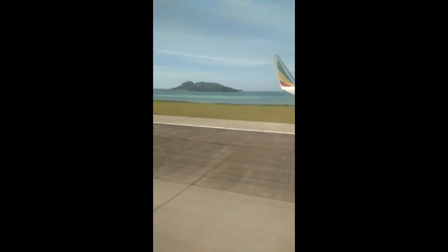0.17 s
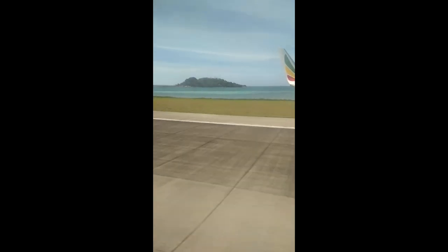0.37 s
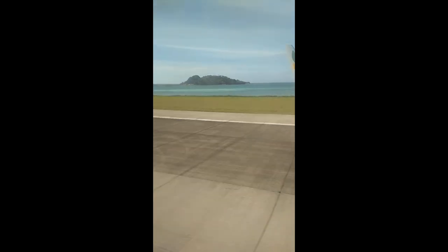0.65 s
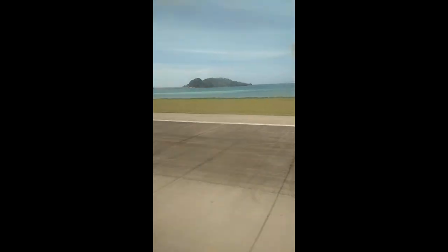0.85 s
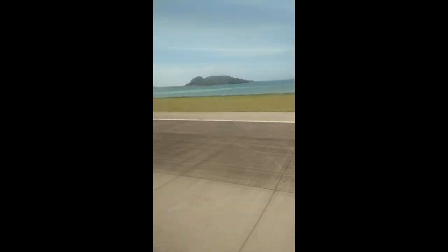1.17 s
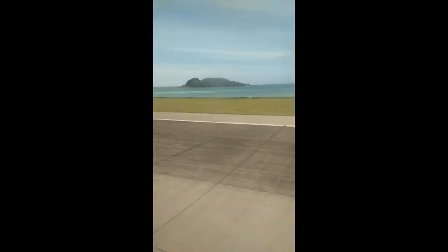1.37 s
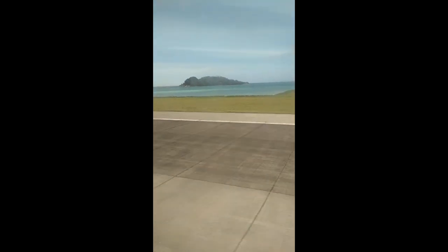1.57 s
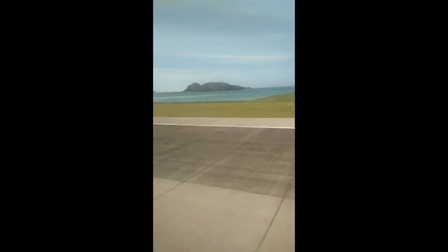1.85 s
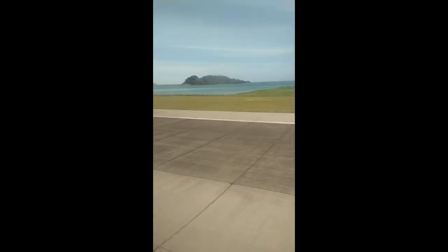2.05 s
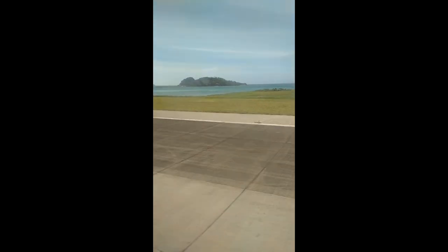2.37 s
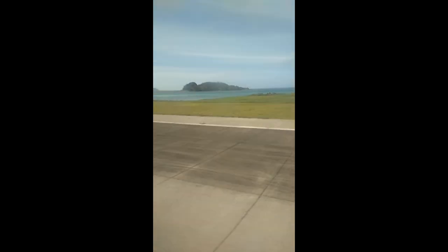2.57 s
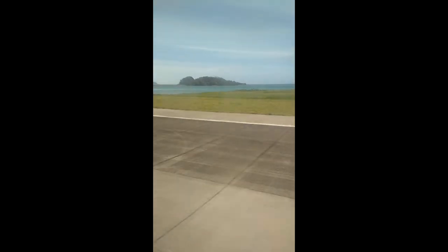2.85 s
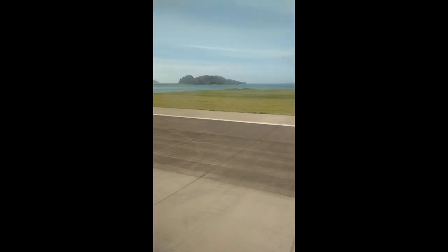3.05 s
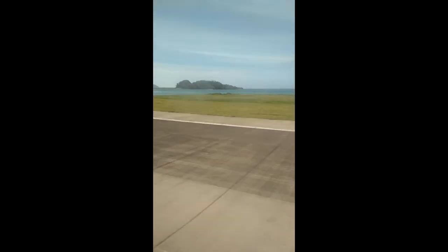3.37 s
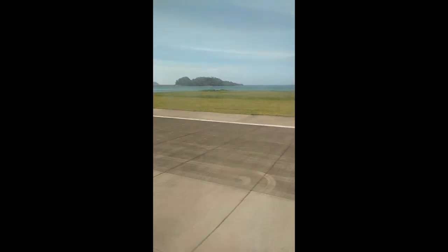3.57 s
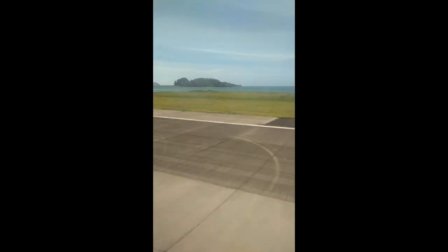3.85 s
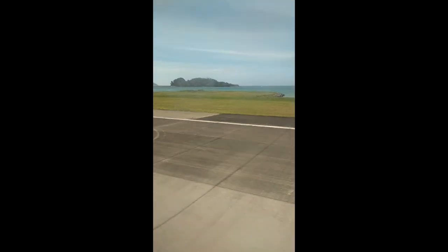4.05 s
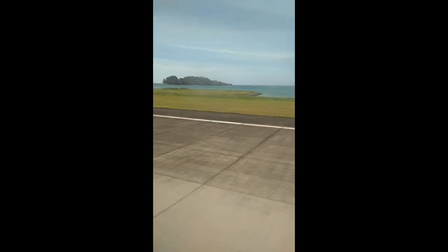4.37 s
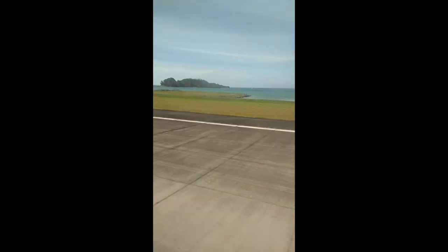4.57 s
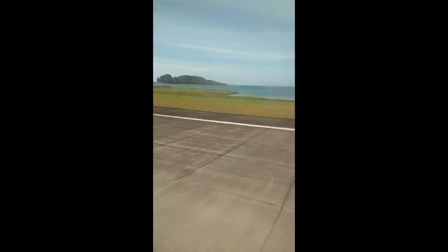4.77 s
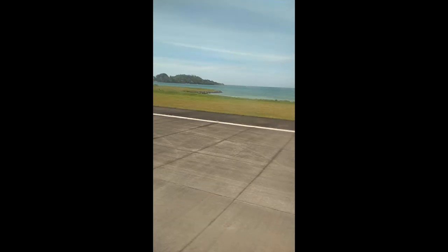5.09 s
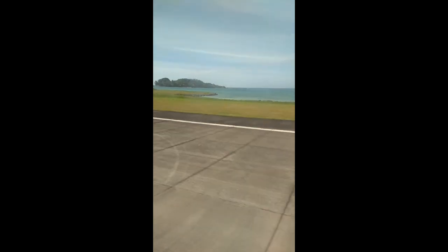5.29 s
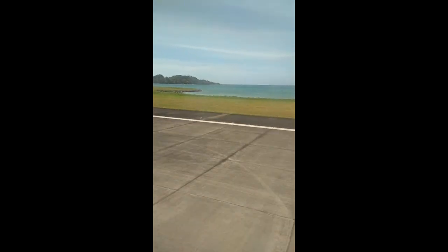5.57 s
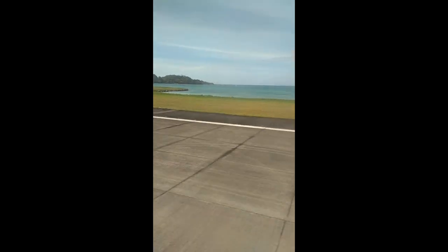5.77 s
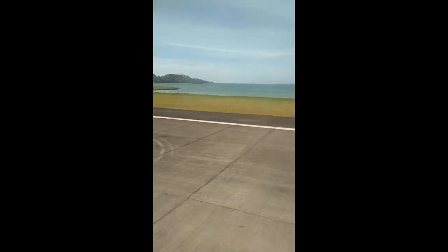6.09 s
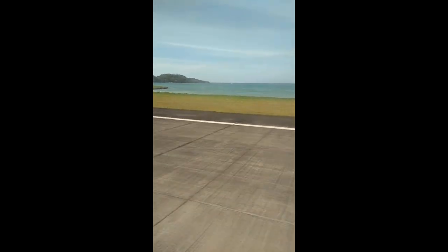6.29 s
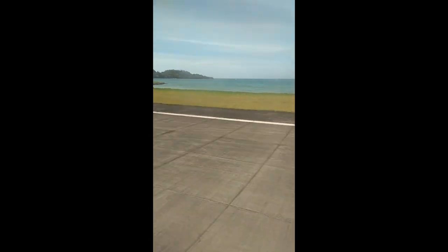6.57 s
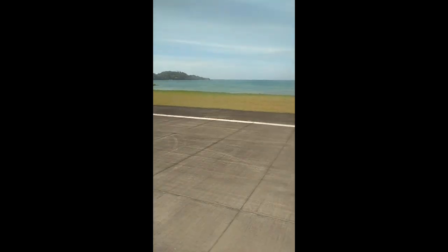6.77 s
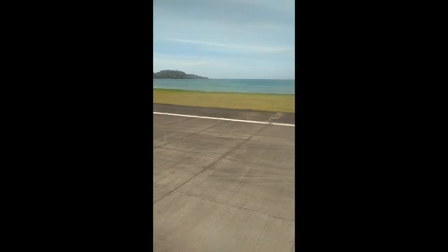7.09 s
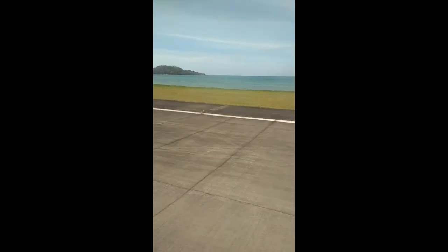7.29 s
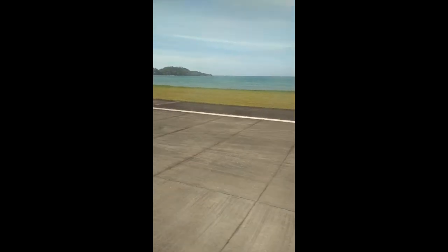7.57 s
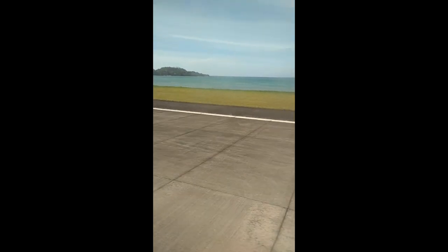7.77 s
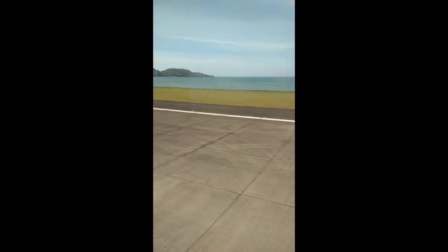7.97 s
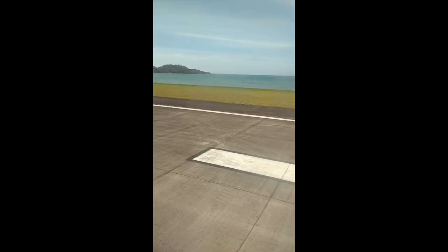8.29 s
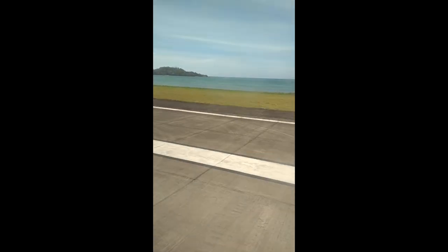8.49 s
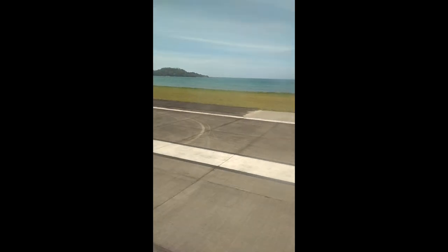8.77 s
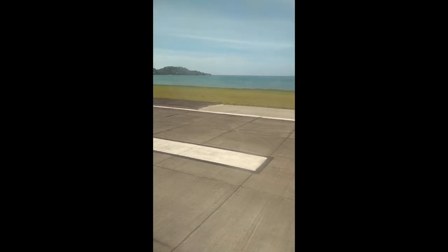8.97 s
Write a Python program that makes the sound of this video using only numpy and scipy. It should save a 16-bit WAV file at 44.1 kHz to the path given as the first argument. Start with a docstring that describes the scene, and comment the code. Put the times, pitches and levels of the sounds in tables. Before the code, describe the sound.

From a window seat inside an airliner slowing on a runway, the engines roar loudly and the handheld microphone overloads, chopping the sound into ragged bursts. After about five seconds it sinks unevenly, bass first. Soft low thumps, loose trim clacking and rattling, tiny squeaks and ticks emerge over hull hum and ventilation with a wavering hiss.

```python
"""Landing roll from a window seat

An airliner rolls out after landing. Reverse thrust, the judder of the hull and deep jolts overload the
microphone, so the roar stutters in ragged bursts. It holds, then sinks unevenly, the bass first, with brief
returns. Soft low swells, rattling and clacking cabin trim, small squeaks and ticks come through, over a low hum
of the hull, ventilation and a flickering hiss."""
import sys
import numpy as np
from scipy import signal
from scipy.fft import rfft, irfft, next_fast_len
from scipy.io import wavfile
from scipy.ndimage import uniform_filter1d, map_coordinates

SR = 44100
rng = np.random.default_rng(int(sys.argv[2]) if len(sys.argv) > 2 else 0)


def wav_out(sig):
    """Save sig, one row per channel (or a flat mono array), as 16-bit PCM at SR to the path in sys.argv[1]."""
    wavfile.write(sys.argv[1], SR, np.round(np.clip(np.atleast_2d(sig).T, -1, 1) * 32767).astype(np.int16))


N = 403074
TIME = np.arange(N) / SR  # s
FREQ = np.maximum(np.arange(N // 2 + 1) * SR / N, 1)  # Hz

# course of the roar: holds, then sinks unevenly with brief returns: time_s, level_db (against its start)
ROAR_COURSE = [(0, 0), (1.5, 1), (2.4, -0.24), (4.0, 0.5), (5.1, -4.5), (5.65, -6.5), (6.0, -9.5),
               (6.3, -10), (6.6, -12.5), (7.25, -20), (7.75, -25.5), (8.0, -21), (8.2, -31), (8.75, -38),
               (9.14, -30)]
# colour of the pressure from the engines: frequency_hz, density_db (per Hz)
PRESSURE = [(14, -4), (30, 3.5), (55, 0), (110, -3.5), (200, -2), (350, -10.5), (700, -24.5), (1300, -37.5),
            (2500, -49.5), (5000, -56.5), (8300, -54), (11200, -46.5), (13500, -52.5), (16000, -76)]
# colour of the hull on its wheels: frequency_hz, density_db (per Hz)
HULL = [(15, 4), (28, -10), (42, 5.5), (53, 8.5), (70, -0.5), (100, -5.5), (150, -11.5), (220, -14.5),
        (330, -68), (1500, -83)]
# gusts and lulls in the rush of exhaust and air: centre_s, half_length_s, gain_db
GUSTS = [(0.055, 0.0084, 5), (0.68, 0.05, 2), (1.92, 0.011, 2), (2.42, 0.016, 5), (3.16, 0.01, -1),
         (3.35, 0.016, 2), (4.235, 0.014, -1), (4.675, 0.015, 1), (4.86, 0.077, 1), (5.13, 0.013, 2.5),
         (5.31, 0.025, -0.5), (5.53, 0.024, 0.5), (5.73, 0.044, 0.5), (6.26, 0.025, -4.5), (6.5, 0.097, 2),
         (8.81, 0.05, -1.5)]
# resonances of single panels: frequency_hz
PANEL_HZ = [474, 547, 567, 627]


def undb(db):
    """Decibels to gain."""
    return 10 ** (np.asarray(db) / 20)


def unit(x):
    """Scale to an rms of one."""
    return x / np.sqrt(np.mean(x ** 2))


def steady(x, window_s=.5):
    """Even out the level to an rms near one over a sliding window, alike at both ports."""
    return x / np.sqrt(uniform_filter1d(np.mean(x ** 2, axis=0), int(SR * window_s)))


def curves(table):
    """Each column of a table joined by straight lines in time."""
    s, *columns = np.transpose(table)
    return [np.interp(TIME, s, c) for c in columns]


def response(points):
    """Gain at every frequency from (Hz, dB) points."""
    hz, db = np.transpose(points)
    return undb(np.interp(np.log(FREQ), np.log(hz), db))


def shaped(x, gain):
    """Filter without phase shift."""
    size = next_fast_len(N, real=True)
    bins_hz = np.arange(size // 2 + 1) * SR / size
    return irfft(rfft(x, size) * np.interp(bins_hz, FREQ, gain), size)[..., :N]


def above(hz):
    """Gain of a steep high-pass; its complement is the low-pass."""
    return 1 / (1 + (hz / FREQ) ** 6)


def walk(rate_hz):
    """Smooth random wander with a spread of one."""
    return unit(shaped(rng.standard_normal(N), np.exp(-(FREQ / rate_hz) ** 2)))


def field(points):
    """Diffuse cabin noise: alike at both microphone ports in the bass, unrelated in the treble."""
    # side against mid: frequency_hz, gain_db
    width = [(30, -48.5), (120, -8.5), (250, -17.5), (500, -8.5), (1000, -0.5), (2000, 0.5)]
    mid, side = rng.standard_normal((2, N))
    side = shaped(side, response(width))
    return unit(shaped(np.array([mid + side, mid - side]), response(points)))


def saturate(x, knee):
    """Linear for small swings, flat beyond one."""
    return x / (1 + np.abs(x) ** knee) ** (1 / knee)


def swell(s, length):
    """The samples near time s and a bell-shaped envelope over them."""
    near = np.flatnonzero(np.abs(TIME - s) < 4 * length)
    return near, np.exp(-.5 * ((TIME[near] - s) / length) ** 2)


def swells(table):
    """Level in dB that rises or falls around each row's time."""
    return sum(db * np.exp(-.5 * ((TIME - s) / length) ** 2) for s, length, db in table)


def strike(s, rise, fade):
    """The samples after time s and an envelope over them that rises fast and fades."""
    near = np.flatnonzero((TIME >= s) & (TIME < s + 8 * fade))
    age = TIME[near] - s
    return near, np.minimum(age / rise, 1) * np.exp(-age / fade)


def burst(s, hz, length, spread, side_db):
    """A short swell of noise in a band around hz, with an rms of one at its top."""
    size = 2 ** 14
    f = np.maximum(np.arange(size // 2 + 1) * SR / size, 1)
    band = np.exp(-.5 * (np.log(f / hz) / spread) ** 2)
    mid, side = irfft(rfft(rng.standard_normal((2, size))) * band)
    near, bell = swell(s, length)
    ports = mid + undb(side_db) * side * np.array([[1], [-1]])
    out = np.zeros((2, N))
    out[:, near] = unit(bell * ports[:, near % size]) * np.sqrt(np.mean(bell ** 2))
    return out


def overload():
    """Deep swings pin the microphone: returns the squared-off roar and the share of small sounds let by."""
    # drive against the microphone's limit: time_s, engine_db (before surges), judder_db
    shake = [(0, 4, -7), (4.2, 2, -6.5), (5.5, 0.5, -4), (6.3, -0.5, -9.5), (7.3, -1, -3),
             (7.8, -9.5, -4.5), (9.14, -8.5, -4)]
    # the microphone's bass cut: frequency_hz, gain_db
    bass_cut = [(20, -103), (55, -22.5), (100, -8), (135, -6.5), (175, -0.5), (260, -2), (500, -6.5)]
    engine_db, judder_db = curves(shake)
    surge_db = 0.5 * walk(rate_hz=37.0)
    engines = field(PRESSURE) * undb(engine_db + surge_db)
    judder = field(HULL)[0] * undb(judder_db)
    pressure = engines + judder + jolts()
    passing = 1 / (1 + np.abs(pressure) ** 6)
    return shaped(saturate(pressure, knee=120), response(bass_cut)), passing


def jolts():
    """Each jolt judders the airframe briefly; every deep swing, up or down, cuts the roar for an instant."""
    # jolts that choke the microphone: centre_s, half_length_s, level_db (relative to one another)
    jolt_rows = [(0.263, 0.012, 15.5), (0.292, 0.0098, 16.5), (0.435, 0.01, 16), (0.46, 0.02, 12),
                 (0.622, 0.012, 7), (0.713, 0.0026, 5), (0.754, 0.0093, 9), (0.892, 0.014, -1),
                 (1.122, 0.011, 10), (1.369, 0.012, 12), (1.413, 0.011, 11), (1.562, 0.0097, 7.5),
                 (1.609, 0.0061, 12), (1.641, 0.0086, 9.5), (1.723, 0.017, 9), (2.222, 0.0083, 10),
                 (2.305, 0.013, 11.5), (2.545, 0.0083, 12), (2.641, 0.013, 14.5), (2.689, 0.0062, 10.5),
                 (2.711, 0.0085, -0.5), (3.065, 0.0049, 6.5), (3.113, 0.015, 9.5), (3.201, 0.013, 6),
                 (3.38, 0.014, 10), (3.572, 0.012, 9.5), (3.892, 0.0074, 8), (4.104, 0.024, 12),
                 (4.175, 0.025, 9), (4.269, 0.014, 7.5), (4.624, 0.0069, 12), (4.827, 0.0053, 0),
                 (4.882, 0.004, 15), (5.038, 0.0057, 8.5), (5.103, 0.0066, 7), (5.21, 0.0046, 7),
                 (5.238, 0.013, 3.5), (5.309, 0.018, 7.5), (5.42, 0.01, 0), (5.669, 0.017, 5.5),
                 (5.702, 0.028, 7), (5.865, 0.0088, 8), (5.916, 0.0067, 8.5), (6.105, 0.0041, 1),
                 (6.205, 0.0077, 2), (6.263, 0.015, 2), (6.317, 0.014, 3), (6.693, 0.013, 4),
                 (6.724, 0.0062, 11), (6.788, 0.0052, 20), (6.836, 0.012, 8), (6.885, 0.011, 12.5),
                 (6.923, 0.0055, 14), (7.051, 0.01, 1), (7.091, 0.008, 13), (7.293, 0.027, 3.5),
                 (7.35, 0.0068, 14), (7.55, 0.0039, 8), (7.899, 0.0028, 11), (7.981, 0.0037, 3),
                 (8.379, 0.0037, 18), (8.506, 0.01, 5), (8.743, 0.0046, 20), (8.777, 0.012, 1.5),
                 (8.864, 0.012, 6), (9.006, 0.0036, 15)]
    start_hz, sag_hz_per_s = 53.4, 1  # the judder slows with the wheels
    all_jolts_db = 2
    out = np.zeros(N)
    for s, length, db in jolt_rows:
        near, bell = swell(s, length)
        hz = start_hz - sag_hz_per_s * s
        out[near] += undb(db + all_jolts_db) * bell * np.cos(2 * np.pi * hz * (TIME[near] - s))
    return out


def roar(overloaded, passing):
    """The overloaded roar holds, then sinks unevenly, the bass first, and takes on the ring of the cabin."""
    # cabin resonances that stand out as the roar sinks: frequency_hz, gain_db
    cabin_ring = [(110, 6), (180, 5), (220, -7.5), (275, -9), (340, -1.5), (440, 2.5), (640, 3), (770, 2.5),
                  (900, 0.5), (1030, 0), (1230, 0.5), (1900, 3.5), (5000, -0.5), (9000, 6.5), (12500, 14),
                  (15500, 21.5)]
    # buffets that swell the boom, and lulls between them: centre_s, half_length_s, gain_db
    buffets = [(0.15, 0.04, 1.5), (0.37, 0.035, 2.5), (0.515, 0.021, 3), (0.795, 0.015, -8),
               (1.19, 0.036, 6), (1.275, 0.014, -10), (1.315, 0.014, 5.5), (1.8, 0.032, -0.5),
               (1.93, 0.026, 4), (2.03, 0.026, 4), (2.115, 0.0096, 8.5), (2.48, 0.017, 1),
               (2.76, 0.046, -3), (3.01, 0.057, 2), (3.27, 0.02, 4), (3.68, 0.017, 6.5), (3.77, 0.018, 1),
               (4.01, 0.03, 0), (4.13, 0.024, -9), (4.36, 0.031, 4), (4.56, 0.031, 3), (4.71, 0.014, 1),
               (4.88, 0.021, -3), (5.225, 0.012, -9), (5.325, 0.02, -10), (5.735, 0.021, -12)]
    # surges that sharpen the ragged edge: centre_s, half_length_s, gain_db
    surges = [(0.2, 0.038, 1), (0.515, 0.013, 1.5), (0.83, 0.025, 1), (1.2, 0.014, 3.5), (1.31, 0.022, 4),
              (1.62, 0.014, 4.5), (2.005, 0.009, 1), (2.6, 0.022, 2.5), (2.688, 0.011, 6),
              (2.995, 0.012, 2.5), (3.565, 0.011, 6), (3.91, 0.011, 0.5), (4.0, 0.012, 3)]
    # how each part follows the course: start_db, slope (dB per dB), knee_db, further slope below the knee
    boom_law = (-14, 0.58, -7.5, 6)
    rush_law = (-15.5, 0.97, -8.5, 0.44)
    rasp_law = (-32, 0.89, 2.5, -0.0246)
    chop_share = 0.43  # of the sinking roar that a choke cuts away

    ringing = np.interp(TIME, [5.5, 6.6], [0, 1])
    heard = (1 - ringing) * overloaded + ringing * shaped(overloaded, response(cabin_ring))
    rush, rasp, air = above(hz=304), above(hz=930), above(hz=5800)

    boom_db = swells(buffets) + 0.87 * walk(rate_hz=18)
    boom = steady(shaped(heard, 1 - rush), window_s=0.213) * follow(boom_law) * undb(boom_db)

    exhaust = steady(shaped(heard, rush - rasp), window_s=0.15)
    exhaust = exhaust * follow(rush_law) * undb(swells(GUSTS))

    # a wash of airflow lies under the ragged edge of the roar
    airflow = field(PRESSURE)
    wash = steady(passing * shaped(airflow, rasp - air)) * undb(-17.5)
    edge = steady(shaped(heard, rasp - air), window_s=.25) + wash
    edge = edge * follow(rasp_law) * undb(swells(surges))

    # the roar flutters more deeply late in the roll
    flutter = undb(np.interp(TIME, [4.5, 6.5], [1.0, 2.6]) * walk(rate_hz=99) + 0.18)
    # and the judder of the wheels chops what is left of it
    chop = 1 - ringing * chop_share * (1 - uniform_filter1d(passing, size=130))
    ragged = flutter * chop * (exhaust + edge) * undb(1.0 * ringing)
    return boom + ragged + treble(shaped(heard, air), shaped(airflow, air), passing)


def follow(law):
    """Gain of one part of the roar: it follows the course, on a second slope below a knee."""
    start_db, slope, knee_db, further = law
    course_db = curves(ROAR_COURSE)[0]
    return undb(start_db + slope * course_db + further * np.minimum(course_db - knee_db, 0))


def treble(crackle, airflow, passing):
    """Airy hiss: one part cuts out with the roar, a smoother part lies under it."""
    # course of the treble hiss, before one common trim: time_s, level_db
    hiss_course = [(0, -46.5), (4.65, -48), (4.88, -45), (5.25, -51), (6.0, -51), (6.25, -55.5), (6.6, -52),
                   (6.85, -53.5), (7.3, -60), (7.8, -57.5), (8.25, -53.5), (8.6, -55.5), (8.8, -57),
                   (9.14, -56.5)]
    smoother = steady(uniform_filter1d(passing, size=220) * airflow) * undb(1.0)
    hiss = steady(crackle, window_s=0.31) + smoother
    return hiss * undb(curves(hiss_course)[0] - 2.65) * flicker()


def flicker():
    """The treble wavers, more so late in the roll, and flares in short spits with a sudden start."""
    spits_per_s, fade_s, spit_db = 20, 0.0077, -9  # dB against the steady hiss, for the strongest spits
    waver_db = np.interp(TIME, [4, 6.5], [0.9, 1.7]) * walk(rate_hz=11)
    starts = (rng.random(N) < spits_per_s / SR) * rng.uniform(.3, 1, N)
    spits = signal.lfilter([1], [1, -np.exp(-1 / (fade_s * SR))], starts)
    return undb(waver_db) * np.hypot(1, undb(spit_db) * spits)


def flares():
    """Crackly flares of treble leap out of the hiss and fade."""
    # sudden flares: start_s, fade_s, level_db (relative to one another)
    flare_rows = [(0.645, 0.022, -38), (4.83, 0.035, -42), (5.115, 0.045, -44), (5.555, 0.02, -41),
                  (5.862, 0.012, -44), (5.945, 0.019, -44), (6.045, 0.03, -42), (6.135, 0.022, -37),
                  (6.333, 0.014, -40), (6.71, 0.012, -42), (6.755, 0.0085, -50), (6.797, 0.0077, -38),
                  (7.028, 0.0095, -55), (7.22, 0.025, -57), (8.305, 0.013, -43), (8.385, 0.011, -40),
                  (8.455, 0.011, -39), (8.518, 0.015, -44), (8.595, 0.041, -46), (8.8, 0.014, -58),
                  (8.892, 0.016, -42), (9.012, 0.0088, -40)]
    # colour of a flare: frequency_hz, density_db (per Hz)
    flare_colour = [(2000, -21), (4500, -10), (8000, -7.5), (11500, 4.5), (14500, 0), (16000, -6)]
    rise_s, all_flares_db = 0.0044, 1
    level = np.zeros(N)
    for s, fade, db in flare_rows:
        near, blow = strike(s, rise_s, fade)
        level[near] += undb(db + all_flares_db) * blow
    return field(flare_colour) * level * undb(2.0 * walk(rate_hz=140))


def low_swells():
    """Soft, short swells of low-pitched noise, nearly alike at both ports, as the roar sinks."""
    # swells: centre_s, pitch_hz, half_length_s, level_db (relative to one another)
    swell_rows = [(5.058, 220, 0.0055, -2), (5.278, 191, 0.0095, -11), (5.456, 210, 0.017, -7.5),
                  (5.529, 187, 0.0061, -13), (5.63, 161, 0.02, -13), (5.767, 328, 0.0036, -9),
                  (5.788, 189, 0.0064, -12), (5.833, 209, 0.0067, -11), (5.886, 320, 0.0041, -10.5),
                  (5.618, 350, 0.033, -13.5), (6.042, 275, 0.0094, -14.5), (6.073, 265, 0.016, -18.5),
                  (6.15, 172, 0.016, -13.5), (6.158, 320, 0.0063, -10), (6.396, 220, 0.0041, -11),
                  (6.52, 366, 0.095, -20), (6.536, 176, 0.01, -13), (6.563, 127, 0.017, -17.5),
                  (6.63, 173, 0.03, -22.5), (6.64, 334, 0.016, -17.5), (6.877, 417, 0.0061, -21),
                  (6.899, 323, 0.0028, -21), (6.947, 192, 0.0039, -18), (7.025, 327, 0.0073, -19.5),
                  (6.988, 474, 0.037, -27), (7.142, 142, 0.019, -18.5), (7.15, 189, 0.0048, -20.5),
                  (7.175, 185, 0.0053, -9.5), (7.213, 176, 0.024, -24.5), (7.265, 264, 0.0091, -24),
                  (7.418, 370, 0.007, -35), (7.458, 284, 0.01, -18.5), (7.502, 330, 0.018, -25.5),
                  (7.56, 295, 0.016, -30), (7.71, 280, 0.017, -33), (8.145, 232, 0.016, -29.5),
                  (8.35, 305, 0.0078, -25), (8.373, 323, 0.022, -32.5)]
    low_noise = sum(undb(db) * burst(s, hz, length, spread=0.21, side_db=-25)
                    for s, hz, length, db in swell_rows)
    return undb(-3.0) * low_noise


def clacks():
    """A loose panel hits its frame: a sudden crack of the trim, then a brief ring of that panel."""
    # sharp clacks: start_s, level_db (relative to one another)
    clack_rows = [(6.609, -20), (6.7, -21), (6.709, -42), (6.806, -39), (6.893, -22), (7.021, -24),
                  (7.065, -23), (7.083, -20.5), (7.15, -23.5), (7.26, -27), (7.285, -27), (7.316, -31),
                  (7.372, -41), (7.44, -21), (7.502, -26.5), (7.577, -24.5), (7.802, -44), (7.817, -45),
                  (7.886, -32), (7.913, -25), (7.965, -24), (7.992, -36), (8.021, -30), (8.236, -28),
                  (8.29, -33), (8.427, -37), (8.642, -34), (8.692, -38), (8.888, -39), (8.902, -34),
                  (9.095, -33)]
    rise_s, fade_s, all_clacks_db = 0.0006, 0.01, -7
    ring_fade_s, ring_db = 0.0085, 7  # dB against the crack
    out, trim = np.zeros((2, N)), field(trim_colour())
    for (s, db), hz in zip(clack_rows, rng.choice(PANEL_HZ, len(clack_rows))):
        near, blow = strike(s, rise_s, fade_s)
        age = TIME[near] - s
        crack = unit(trim[:, near] * blow) * np.sqrt(np.mean(blow ** 2))
        ring = np.sin(2 * np.pi * hz * age) * np.exp(-age / ring_fade_s)
        out[:, near] += undb(db + all_clacks_db) * (crack + undb(ring_db) * ring)
    return out


def trim_colour():
    """What the loose trim rings with, in clacks and rattles alike."""
    # ring of the trim: frequency_hz, density_db (per Hz)
    trim_points = [(200, -33), (440, 13.5), (600, 17), (800, 1), (1020, 9), (1400, -5), (2000, -6.5),
                   (2900, -20.5), (4500, -30), (9000, -28)]
    return trim_points


def rattles():
    """Loose trim chatters in short fits of tiny collisions, each led by one of the panel resonances."""
    # fits of rattling: centre_s, half_length_s, level_db (relative to one another)
    rattle_rows = [(6.809, 0.008, -23), (6.973, 0.017, -37), (7.04, 0.011, -24), (7.374, 0.025, -38),
                   (7.456, 0.031, -32), (7.605, 0.017, -38.5), (7.83, 0.037, -42), (7.928, 0.013, -29),
                   (7.962, 0.006, -34), (8.047, 0.02, -34), (8.247, 0.008, -44), (8.317, 0.0078, -43),
                   (8.452, 0.023, -48), (8.708, 0.014, -40.5), (8.9, 0.007, -37), (8.954, 0.021, -40.5),
                   (9.017, 0.011, -42), (9.115, 0.022, -46.5)]
    collisions_per_s, fade_s, chatter_db = 380, 0.0021, -0.5
    fits, rings = np.zeros(N), 0
    picks = rng.integers(0, len(PANEL_HZ), len(rattle_rows))
    for (s, length, db), pick in zip(rattle_rows, picks):
        near, bell = swell(s, length)
        fits[near] += undb(db) * bell
        ring = burst(s, PANEL_HZ[pick], length, spread=0.026, side_db=-39)
        rings = rings + undb(db - 4.5) * ring
    collisions = (rng.random(N) < collisions_per_s / SR) * 1.
    # a little steady buzz lies under the collisions
    grit = signal.lfilter([1], [1, -np.exp(-1 / (fade_s * SR))], collisions) + .2
    return fits * unit(field(trim_colour()) * grit) * undb(chatter_db) + rings


def squeaks():
    """Cabin fittings squeak: narrow swells of noise at a high pitch, roughened in level."""
    # squeaks: centre_s, pitch_hz, half_length_s, level_db (relative to one another)
    squeak_rows = [(5.77, 3600, 0.019, -52), (6.81, 2970, 0.0028, -46.5), (7.026, 1980, 0.0028, -45),
                   (8.94, 1500, 0.015, -53)]
    tones = sum(undb(db) * burst(s, hz, length, spread=0.21, side_db=-4)
                for s, hz, length, db in squeak_rows)
    return undb(9.0 + 2 * walk(rate_hz=130)) * tones


def ticks():
    """Cabin fittings tick: very short, broad bursts of treble."""
    # sharp ticks: centre_s, level_db (relative to one another)
    tick_rows = [(5.96, -42), (7.125, -38.5), (7.365, -43)]
    clicks = sum(undb(db) * burst(s, hz=9700, length=0.0017, spread=1.0, side_db=0) for s, db in tick_rows)
    return undb(4.0) * clicks


def hum():
    """The hull hums deeply on its wheels."""
    # course of the hum: time_s, level_db
    hum_course = [(0, -30.5), (3, -32.5), (5.6, -30), (6.5, -32.5), (7.5, -32), (9.14, -35.5)]
    return field(HULL) * undb(curves(hum_course)[0])


def cabin_air():
    """Ventilation and idling engines blow; an airy whistle emerges as the roar sinks."""
    # colour of ventilation and idling engines: frequency_hz, density_db (per Hz)
    idle_colour = [(80, -6), (150, 17), (270, 9), (340, 10.5), (450, 14), (660, -6), (770, -28), (900, -46),
                   (1020, -1), (1220, -36), (1500, -34), (2000, -15), (2800, -11.5), (4000, -15.5),
                   (6300, -20), (10000, -23), (16000, -34)]
    air = field(idle_colour) * undb(-43.5 + 1.5 * walk(rate_hz=20) + swells(GUSTS))
    whistle_db = np.interp(TIME, [6.9, 7.25, 8.2, 8.8, 9.1], [-62, -50, -55, -59, -54])
    whistle = field([(850, -40), (980, 0), (1070, -2), (1220, -40)]) * undb(whistle_db)
    return air + whistle


def floor_hiss():
    """A faint even hiss goes on when the microphone chokes; its level follows the course of the roar."""
    # colour of the faint hiss: frequency_hz, density_db (per Hz)
    floor_colour = [(800, 15.5), (2000, 12), (6000, -0.5), (11000, -4.5), (16000, -26)]
    start_db, slope = -46, 0.87  # slope in dB per dB of the course
    return field(floor_colour) * undb(start_db + slope * curves(ROAR_COURSE)[0])


def scene():
    """Most sound is slightly louder on the right; late in the roll it also reaches the right port first."""
    # left port against right: frequency_hz, gain_db
    port_tilt = [(60, -2), (200, -1.6), (500, -0.3), (1800, -1.9), (4000, -0.9), (7500, 0), (10000, -3),
                 (12000, -1)]
    overloaded, passing = overload()
    main = roar(overloaded, passing) + flares()
    details = low_swells() + clacks() + passing * rattles() + squeaks() + ticks()
    background = hum() + passing * cabin_air() + floor_hiss()
    left, right = main + details + background
    lag_s = np.interp(TIME, [6.4, 6.5], [0, .00038])
    left = map_coordinates(left, [(TIME - lag_s) * SR], order=3)
    tilt = np.sqrt(response(port_tilt))  # half of it on each port
    return np.array([shaped(left, tilt), shaped(right, 1 / tilt)])


def record(dry):
    """The phone rounds the tallest peaks and cuts the top."""
    top_hz = 15950
    rounded = saturate(dry, knee=5)
    return signal.sosfiltfilt(signal.ellip(8, .1, 60, top_hz, fs=SR, output="sos"), rounded)


dry = scene()
out = record(dry)
wav_out(out)
```